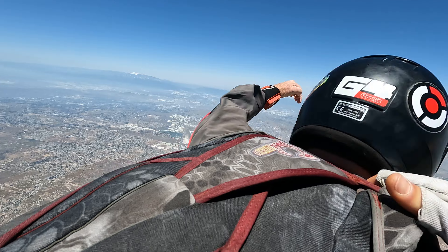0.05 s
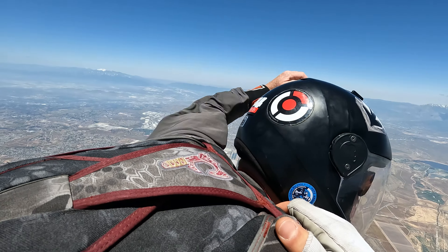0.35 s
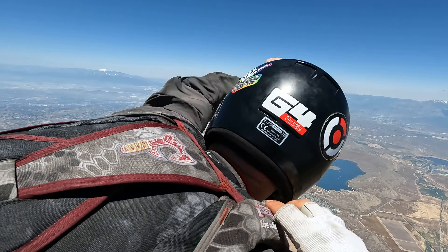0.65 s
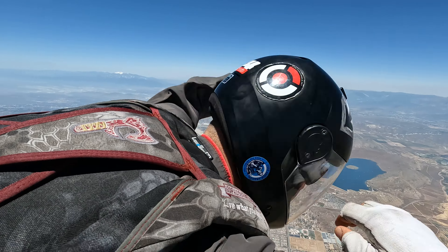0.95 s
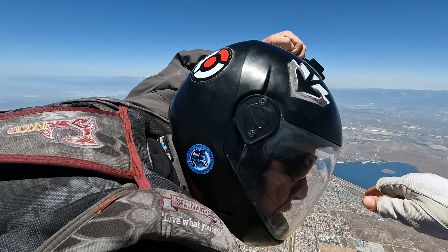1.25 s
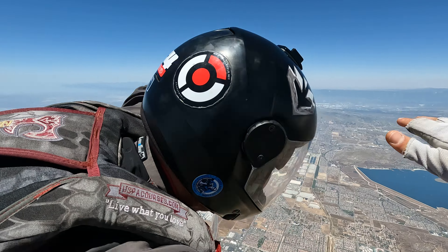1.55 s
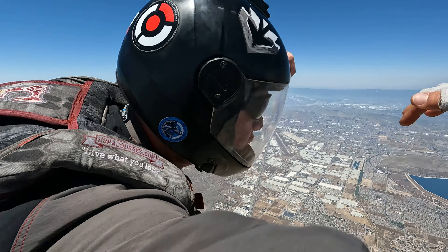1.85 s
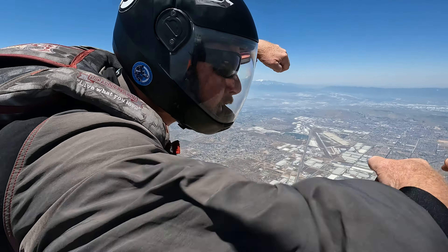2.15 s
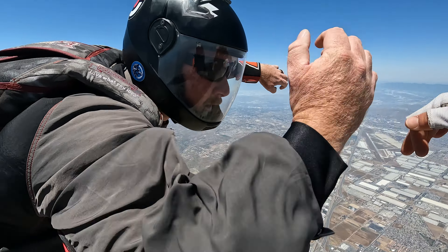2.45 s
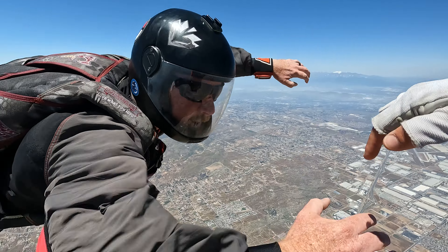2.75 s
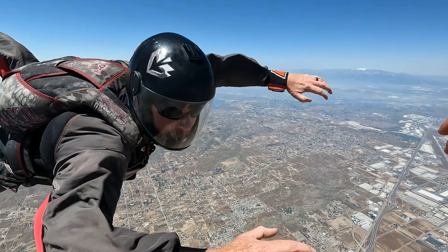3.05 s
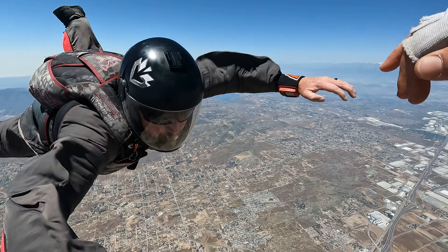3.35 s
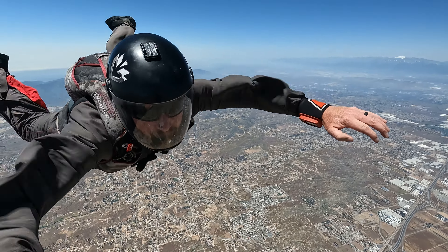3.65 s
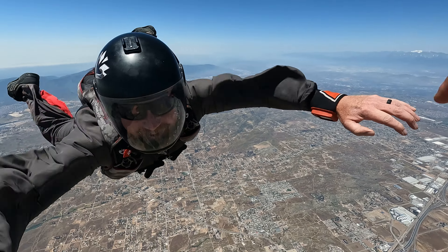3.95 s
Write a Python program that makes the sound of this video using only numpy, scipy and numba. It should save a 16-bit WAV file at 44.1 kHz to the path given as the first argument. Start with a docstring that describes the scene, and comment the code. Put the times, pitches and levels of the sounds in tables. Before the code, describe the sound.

Strong wind rushes past a skydiver's camera in freefall, buffeting the microphone with low thumps and a roar. Ragged hiss, slaps and crackles ride on top; later the roar thins and the hiss grows brighter.

```python
"""Open sky, in freefall: air tears past a small camera on a skydiver circling a partner.
Big eddies thump the microphone and smaller ones roar. Fine turbulence rides on top in ragged
bursts of rush, tear and fizz, with sharp slaps and crackles. As the camera swings round to the
front the roar thins and the hiss grows. A fast limiter holds the level."""
import sys
import numpy as np
from scipy import signal
from scipy.fft import rfft, irfft
from scipy.io import wavfile
from scipy.ndimage import uniform_filter1d, minimum_filter1d
from numba import njit

SR = 44100
rng = np.random.default_rng(int(sys.argv[2]) if len(sys.argv) > 2 else 0)


def generate_wav(signal):
    """Clip the signal to [-1, 1] and save it as 16-bit WAV at the path in sys.argv[1]."""
    frames = np.transpose(np.atleast_2d(signal))
    scaled = np.clip(frames, -1, 1) * 32767
    pcm = np.round(scaled).astype(np.int16)
    wavfile.write(sys.argv[1], SR, pcm)


N = 176400

# tone colour of the wind, shaping each band from within (f/Hz, level/dB)
WIND_COLOUR = [(16, -16), (28, 0), (55, 2), (130, -3), (200, -4), (300, -3), (520, -11), (1050, -17),
               (1800, -26.5), (2900, -32.5), (4000, -42), (5500, -52), (7000, -61.5), (8400, -67.5),
               (10400, -63.5), (12000, -69.5), (13300, -75), (14300, -92.5)]
# fader ride of the bass rumble, the biggest eddies (t/s, level/dB)
RUMBLE_RIDE = [(0.0, -21), (0.24, -25), (0.3, -16.5), (0.6, -22.5), (0.99, -27), (1.08, -25), (1.38, -22),
               (1.77, -22), (2.16, -21.5), (2.31, -24.5), (2.4, -21), (2.46, -23.5), (2.52, -14.5),
               (2.73, -23), (2.85, -14.5), (3.03, -21.5), (3.54, -23.5), (3.99, -23)]
# fader ride of the upper-bass buffeting (t/s, level/dB)
BUFFET_RIDE = [(0.0, -17), (0.25, -15.5), (0.42, -18), (0.6, -13.5), (0.8, -16.5), (0.88, -16.5),
               (0.97, -17.5), (1.03, -12.5), (1.15, -13), (1.23, -10.5), (1.52, -14), (1.66, -10.5),
               (1.76, -13.5), (1.81, -19.5), (1.9, -14.5), (1.98, -14.5), (2.07, -12.5), (2.16, -15.5),
               (2.24, -14), (2.4, -18.5), (2.46, -15), (2.62, -20.5), (2.7, -25.5), (2.82, -21.5),
               (2.87, -22), (2.97, -24), (3.06, -14.5), (3.17, -19), (3.4, -21), (3.87, -16.5), (3.99, -20)]
# fader ride of the low-mid roar (t/s, level/dB)
ROAR_RIDE = [(0.0, -19.5), (0.27, -19.5), (0.57, -21.5), (0.72, -18.5), (0.84, -24.5), (0.99, -21),
             (1.59, -16), (1.68, -12.5), (1.85, -13.5), (1.92, -16), (2.06, -15.5), (2.25, -19.5),
             (2.61, -21.0), (2.73, -30.5), (2.88, -24), (3.06, -24), (3.15, -27), (3.27, -21.5),
             (3.99, -21)]
# shelf on the roar's upper half, dipping so that it deepens at its climax (t/s, gain/dB)
ROAR_SHELF = [(0, 4.5), (1.8, -3.5), (2.7, 2.5), (4, 1)]
# fader ride of the midrange rush (t/s, level/dB)
RUSH_RIDE = [(0.0, -23), (0.33, -26.5), (0.48, -22), (0.57, -28.5), (0.72, -22), (0.78, -30), (0.81, -24),
             (1.05, -24.5), (1.18, -22), (1.62, -22.5), (1.92, -24.5), (1.98, -27), (2.04, -21.5),
             (2.1, -30), (2.16, -24.5), (2.22, -28.5), (2.43, -26), (2.52, -27.5), (2.58, -24.5),
             (2.66, -27), (2.74, -23.5), (2.78, -27), (2.94, -21.5), (3.08, -23), (3.15, -29),
             (3.24, -23.5), (3.6, -23), (3.72, -24.5), (3.88, -23.5), (3.93, -22.5), (3.99, -26.5)]
# fader rides of the tearing hiss (t/s, treble level/dB, top level/dB)
HISS_RIDE = [(0.0, -39, -54), (0.03, -39, -53.5), (0.15, -38.5, -62), (0.23, -34.5, -58), (0.3, -34.5, -51),
             (0.48, -34, -53), (0.54, -41, -60.5), (0.6, -36.5, -55), (0.72, -34.5, -55.5),
             (0.78, -40, -58), (0.84, -33.5, -49.5), (0.87, -42, -60), (0.9, -34.5, -55),
             (0.96, -41.5, -64), (0.99, -34.5, -52), (1.02, -41, -57.5), (1.17, -37, -56),
             (1.23, -36.5, -50.5), (1.32, -35.5, -54), (1.38, -32, -50), (1.47, -39.5, -56.5),
             (1.5, -34.5, -53.5), (1.68, -37, -56), (1.71, -34, -53.5), (1.8, -43, -64), (1.83, -35.5, -56),
             (1.95, -43, -61.5), (2.04, -36, -55), (2.1, -44, -56), (2.16, -35.5, -54.5), (2.22, -43, -58),
             (2.25, -33.5, -54.5), (2.31, -40.5, -56.5), (2.46, -32, -51.5), (2.49, -34, -56.5),
             (2.61, -34, -49.5), (2.64, -36, -60.5), (2.94, -32.5, -51), (3.18, -32.5, -50.5),
             (3.48, -28.5, -45), (3.51, -34, -51), (3.6, -27, -44), (3.66, -32.5, -51),
             (3.93, -28.5, -46.5), (3.99, -35.5, -51.5)]
# shelf on the very top, opening as the camera comes round (t/s, gain/dB)
SHEEN_SHELF = [(0, -6), (1.8, 0.5), (2.6, 4), (4, 4.5)]
# raggedness of the flow, scaling the swells and the spread of crackle levels (t/s, factor)
RAGGEDNESS = [(0, 1.17), (2.1, 1.6), (3.2, 1.2), (4, 1.6)]
# the strongest slaps of air (t/s, half-length/s, mid swell/dB, treble swell/dB, top swell/dB)
AIR_SLAPS = [(0.29, .002, 1.5, 2.5, 7), (0.343, 0.0054, 0, 8, 11.5), (0.379, 0.0016, 0.5, 10.5, 9),
             (0.406, .003, 4.5, 2.5, 10), (0.461, .002, -0.5, -1, 6), (0.495, .002, 5, 1.5, 7.5),
             (0.542, 0.001, 5, 0, 3), (0.616, .005, 3, 5, 6.5), (0.679, 0.0014, 9, 7.5, 6),
             (0.74, 0.0033, 6, 3.5, 6), (0.806, 0.0049, 8.5, 9.5, 10), (0.838, 0.006, 3.5, 4.5, 8),
             (0.889, .003, 8, 5.5, 9), (0.917, 0.0013, 12.5, 8, 9), (0.987, 0.0023, 5.5, 4, 8.5),
             (1.035, .002, 7.5, 9, 7.5), (1.139, 0.0025, -2.5, 8.5, 8.5), (1.238, 0.0031, 4, 10, 9.5),
             (1.282, 0.00086, -3.5, 6, 14), (1.384, 0.0049, 3, 0.5, 6), (1.498, 0.0018, 2.5, 4.5, 8.5),
             (1.564, 0.0013, 9, 10.5, 10), (1.633, 0.0028, 2.5, 11.5, 8.5), (1.691, 0.0017, -1, 4, 8),
             (1.711, 0.0022, 1, 3.5, 6.5), (1.838, 0.0032, 2.5, 2.5, 7), (1.882, .002, 0, 9, 6),
             (1.956, 0.0013, 8, 8, 10.5), (2.17, 0.0013, -4.5, 3.5, 14.5), (2.27, .003, 3.5, 2, 9),
             (2.386, .002, 5, 8.5, 6.5), (2.543, .002, 4, 3, 12), (2.746, 0.0018, -0.5, 8, 10),
             (2.866, 0.0018, 6, 3, 8.5), (2.971, 0.0035, 8, 5, 4.5), (3.106, 0.0018, 3.5, 15.5, 12.5),
             (3.19, .002, 6.5, 3, 10.5), (3.466, 0.0018, 0.5, 4, 6), (3.542, 0.002, 7, 12, 9.5),
             (3.602, .003, -2.5, 7.5, 5.5), (3.676, 0.0023, 3, 5.5, 7.5), (3.759, .0025, 3, 3.5, 9),
             (3.835, 0.0016, 1.5, 8, 5.5), (3.907, 0.0027, 4.5, 9.5, 6), (3.939, .006, 9.5, 4.5, 0.5),
             (3.953, .002, 6.5, 4, 8), (3.978, 0.0016, 14, 10.5, 11.5)]

# trims added to the rides
RUMBLE_DB, BUFFET_DB, ROAR_DB = 2.5, -1.5, -1
RUSH_DB, TEAR_DB, FIZZ_DB, CRACKLE_DB = 0.5, 1.5, 2.5, 4
GUST_HZ, FLUTTER_HZ, BURST_HZ = 22, 129, 545  # how fast the turbulence swells, at three eddy sizes
GUST_DB, FLUTTER_DB, BURST_DB = 1.16, 2, 3.5  # how far, before raggedness scales it
SWELL_CAP_DB = 7.5  # slaps may go higher
SLAP_LIFT_DB, SLAP_GRAIN = 2, 0.37  # grain: share of the fastest flicker heard inside a slap
CRACKLES_PER_S, CRACKLE_SPREAD_DB = 220, 6.5
LIMIT, LIMIT_ATTACK_S, LIMIT_RELEASE_S, CEILING = 0.37, 0.0016, 0.0094, 0.54


def buffeting():
    """The weight of the wind: big eddies thump and buffet the microphone, smaller ones roar."""
    rumble = eddies(lo_hz=24.1, hi_hz=99, evenness=0.2) * undb(curve(RUMBLE_RIDE) + RUMBLE_DB)
    buffet = eddies(lo_hz=99, hi_hz=210, evenness=0.7) * undb(curve(BUFFET_RIDE) + BUFFET_DB)
    roar = eddies(lo_hz=210.6, hi_hz=492, evenness=0.61) * undb(curve(ROAR_RIDE) + ROAR_DB)
    return rumble + buffet + shelf(roar, hz=290, gain_db=curve(ROAR_SHELF))


def eddies(lo_hz, hi_hz, evenness):
    """Low pressure swings on the microphone port; evenness, 0 to 1, irons out their strength."""
    pressure = band(rng.standard_normal(N), lo_hz, hi_hz)
    power = uniform_filter1d(np.abs(signal.hilbert(pressure)) ** 2, size=4400)
    return unit(pressure / power ** (evenness / 2))


def rushing(mids_db, treble_db, top_db):
    """Fine turbulence: rush, tear and fizz burst together, the higher the more sharply."""
    air = rng.standard_normal((3, N))
    fizz_swell_db = np.maximum(top_db + 1.6 * walk(hz=400), -3)
    rush = band(air[0] * surge(mids_db, depth=0.95), lo_hz=440, hi_hz=1513)
    tear = band(air[1] * surge(treble_db), lo_hz=1440, hi_hz=4240)
    fizz = band(air[2] * surge(fizz_swell_db, depth=1.1), lo_hz=4560, hi_hz=14500)
    rush *= undb(curve(RUSH_RIDE) + RUSH_DB)
    tear *= undb(curve(HISS_RIDE) + TEAR_DB)
    fizz *= undb(curve(HISS_RIDE, column=2) + FIZZ_DB)
    return shelf(rush + tear + fizz, hz=9100, gain_db=curve(SHEEN_SHELF))


def turbulence():
    """Eddies within eddies: swells in dB for mids, treble and top; each slap briefly takes over."""
    t = np.arange(N) / SR
    burst_db = BURST_DB * walk(BURST_HZ)
    flow_db = curve(RAGGEDNESS) * (GUST_DB * walk(GUST_HZ) + FLUTTER_DB * walk(FLUTTER_HZ) + burst_db)
    flow_db = np.minimum(flow_db, SWELL_CAP_DB * np.tanh(flow_db / SWELL_CAP_DB))  # dips stay deep
    rush_db = np.minimum(flow_db + 1.2 * walk(hz=110), SWELL_CAP_DB)
    swell_db = np.array([rush_db, flow_db, flow_db])
    for at, width_s, mids_db, treble_db, top_db in AIR_SLAPS:
        slap = np.exp(-.5 * ((t - at) / width_s) ** 2)
        peak_db = np.array([[mids_db], [treble_db], [top_db]]) + SLAP_LIFT_DB + SLAP_GRAIN * burst_db
        swell_db = swell_db * (1 - slap) + slap * peak_db
    return swell_db


def crackling(swell_db):
    """The sharpest eddies snap at the port, loudest inside the bursts."""
    snaps = (rng.random(N) < CRACKLES_PER_S / SR) * rng.choice([-1, 1], N)
    sizes = undb(CRACKLE_SPREAD_DB * curve(RAGGEDNESS) * np.minimum(rng.exponential(size=N), 2.4))
    clicks = snaps * sizes * surge(np.minimum(swell_db, 5))
    return band(clicks, lo_hz=3240, hi_hz=14500) * undb(curve(HISS_RIDE, column=2) + CRACKLE_DB)


def surge(swell_db, depth=1.0):
    """Gain that rides the turbulence while the mean power stays even."""
    gain = undb(depth * swell_db)
    mean_power = uniform_filter1d(uniform_filter1d(gain ** 2, size=3000), size=3000)
    return gain / np.sqrt(mean_power)


def band(x, lo_hz, hi_hz):
    """Steep band-pass tinted with the wind's colour; rms 1."""
    f = np.maximum(np.arange(N // 2 + 1) * SR / N, 1)
    hz, db = np.array(WIND_COLOUR).T
    colour = undb(np.interp(np.log(f), np.log(hz), db))
    edges = 1 / np.sqrt((1 + (lo_hz / f) ** 10) * (1 + (f / hi_hz) ** 10))
    return unit(irfft(rfft(x) * colour * edges, N))


def shelf(x, hz, gain_db):
    """A moving shelf EQ on everything above hz."""
    low = signal.sosfiltfilt(signal.butter(5, hz, fs=SR, output="sos"), x)
    return low + (x - low) * undb(gain_db)


def walk(hz):
    """Random modulation, mostly between hz / 10 and hz; rms 1."""
    f = np.arange(N // 2 + 1) * SR / N
    response = f / (f + hz / 10) / np.sqrt(1 + (f / hz) ** 4)
    return unit(irfft(rfft(rng.standard_normal(N)) * response, N))


def curve(rows, column=1):
    """An automation lane: one column of a table, joined by straight lines in time."""
    rows = np.array(rows)
    return np.interp(np.arange(N) / SR, rows[:, 0], rows[:, column])


def undb(db):
    """Decibels to gain."""
    return 10 ** (np.asarray(db) / 20)


def unit(x):
    """Scale to rms 1."""
    return x / np.sqrt(np.mean(x ** 2))


@njit
def follow(x, attack, release):
    """The limiter's peak follower; attack and release are the share of the gap closed per sample."""
    envelope, level = np.empty(len(x)), 0.
    for i in range(len(x)):
        level += (x[i] - level) * (attack if x[i] > level else release)
        envelope[i] = level
    return envelope


def scene():
    """All the wind at one microphone; rush and crackle share the same turbulence."""
    mids_db, treble_db, top_db = turbulence()
    air = rushing(mids_db, treble_db, top_db)
    return (buffeting() + air + crackling(top_db))[None]


def record(dry):
    """The camera: a fast look-ahead limiter, a soft clip and a steep high cut at 14 kHz."""
    attack = 1 - np.exp(-1 / (LIMIT_ATTACK_S * SR))
    release = 1 - np.exp(-1 / (LIMIT_RELEASE_S * SR))
    peak = follow(np.abs(dry[0]), attack, release)
    gain = LIMIT / np.maximum(peak, LIMIT)
    gain = uniform_filter1d(minimum_filter1d(gain, size=129), size=129)  # ducks just ahead of a peak
    held = dry * gain
    clipped = held / (1 + (held / CEILING) ** 6) ** (1 / 6)
    return signal.sosfilt(signal.ellip(8, .2, 70, 14000, fs=SR, output="sos"), clipped)


dry = scene()
out = record(dry)
generate_wav(out)
```